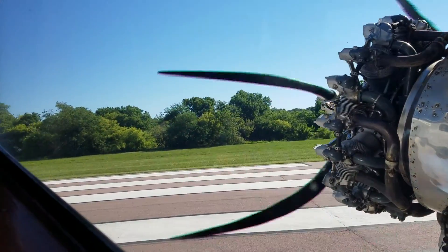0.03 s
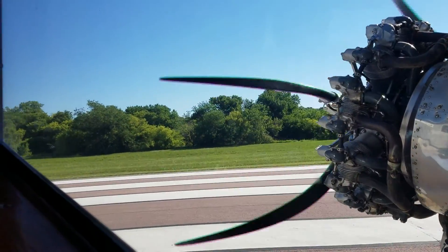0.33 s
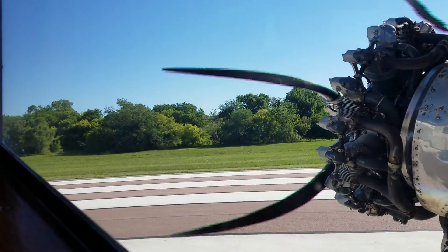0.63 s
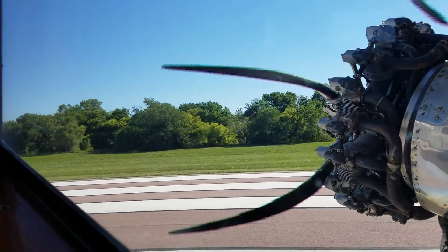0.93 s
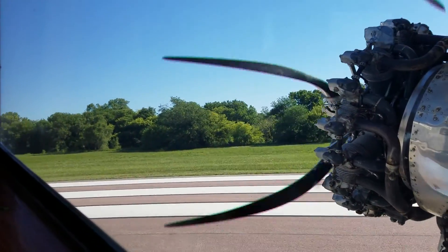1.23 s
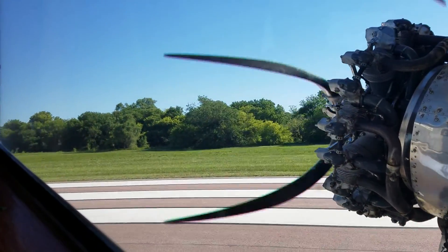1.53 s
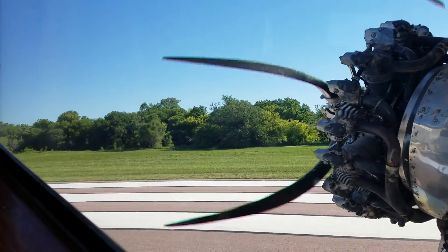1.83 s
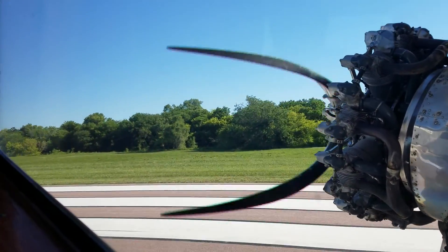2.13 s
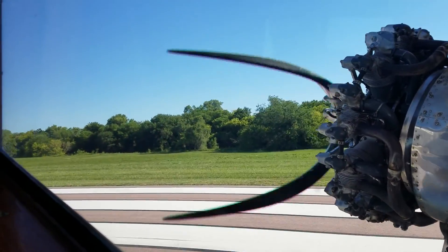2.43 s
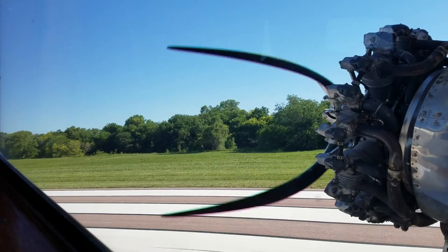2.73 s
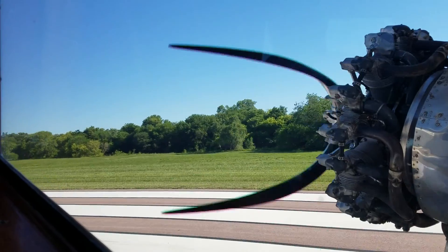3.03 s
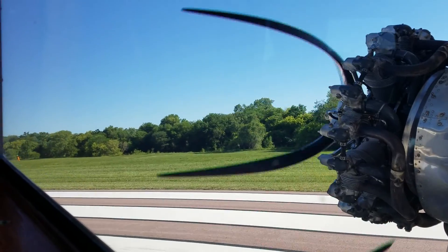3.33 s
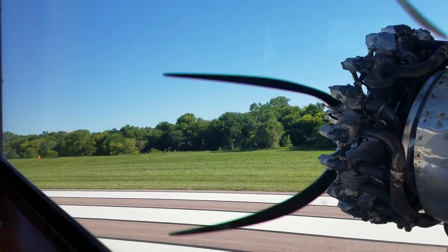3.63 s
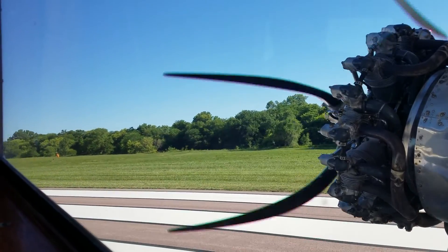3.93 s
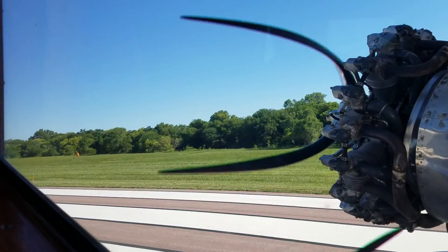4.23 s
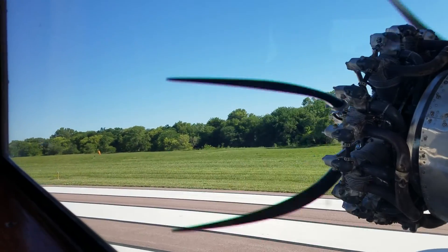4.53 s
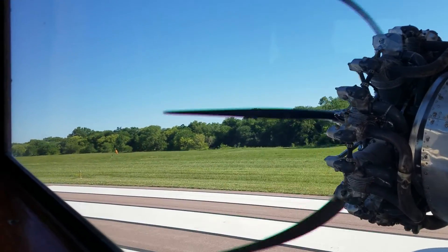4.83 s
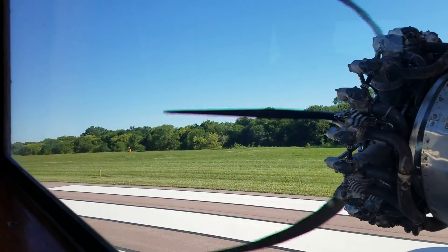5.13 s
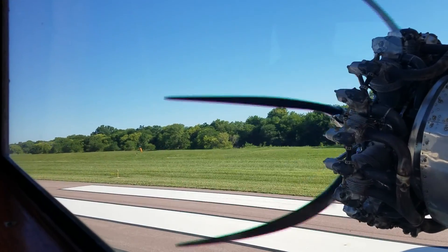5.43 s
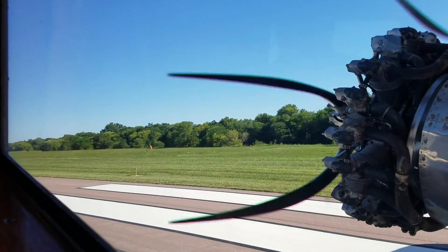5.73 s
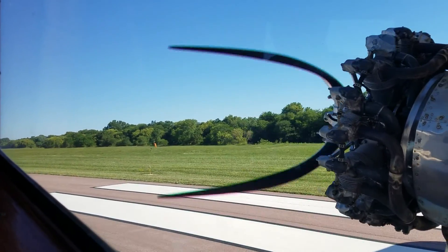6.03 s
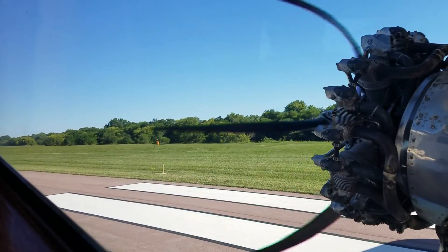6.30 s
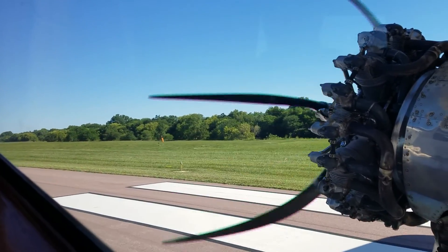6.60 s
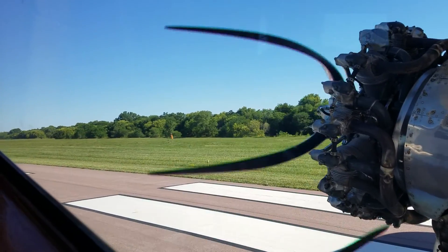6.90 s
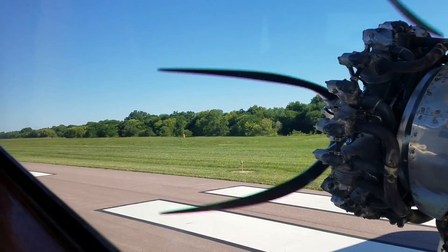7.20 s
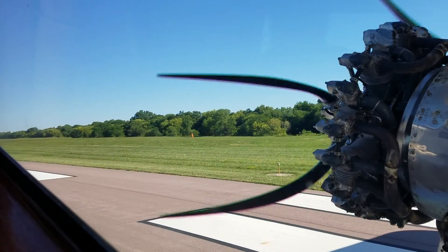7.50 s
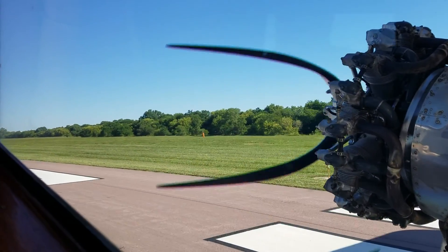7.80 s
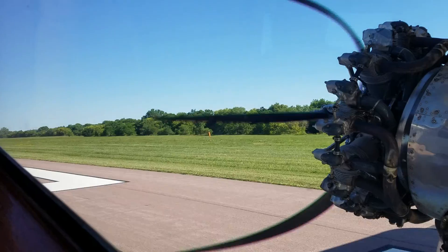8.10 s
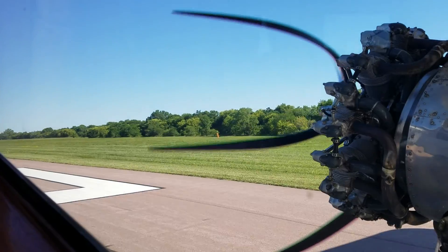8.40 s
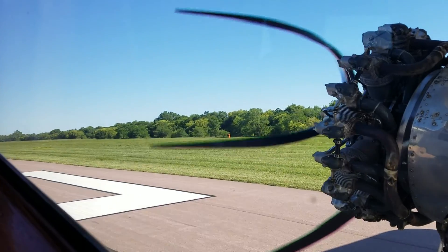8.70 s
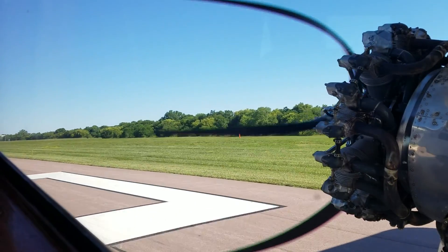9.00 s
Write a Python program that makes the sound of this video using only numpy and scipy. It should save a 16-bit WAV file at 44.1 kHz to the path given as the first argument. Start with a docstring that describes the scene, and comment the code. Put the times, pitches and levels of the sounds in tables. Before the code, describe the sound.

Inside a taxiing aircraft's cockpit, piston engines rumble and pulse low, gradually revving up while a window panel and fittings rattle faintly.

```python
"""A deep, throbbing drone fills the cockpit of a taxiing plane: three nine-cylinder radial engines
turn two-blade propellers. The throttles are eased up in turn, so the three harmonic series slide
past each other and beat by interference. Exhaust pulses rumble through the cabin, gears whine thinly,
valve gear clatters and a window panel rattles in forced vibration. Propeller wash fizzes at a gap,
and loose fittings chatter and squeak."""
import sys
import numpy as np
from scipy import signal
from scipy.fft import rfft, irfft, next_fast_len
from scipy.io import wavfile
from scipy.ndimage import uniform_filter1d, minimum_filter1d

SR = 44100
rng = np.random.default_rng(int(sys.argv[2]) if len(sys.argv) > 2 else 0)


def materialize(psi):
    """Save the field psi as 16-bit PCM at rate SR to the path in sys.argv[1].

    A 1-D psi becomes a single channel; in a 2-D psi each row is a channel.
    """
    bounded = np.clip(np.atleast_2d(psi).T, -1, 1)
    quanta = np.round(bounded * 32767).astype(np.int16)
    wavfile.write(sys.argv[1], SR, quanta)


N = 403515
TIME = np.arange(N) / SR
CYLINDERS = 9

# Levels in the tables are relative; each source applies its own gain.
# near, second and third engine: (idle speed [turns/s], pushes (time [s], gain [turns/s], lag [s]))
THROTTLES = [(23.34, [(2.984, 3.86, .63), (6.442, 1.33, .45), (7.295, 2.49, .66)]),
             (20.51, [(1.942, 4.85, .547), (5.31, 3.64, .48), (7.775, .9, .33)]),
             (20.61, [(.571, 4.7, .503), (4.193, 4.035, .418), (6.927, .81, .87)])]
# low, middle and high throttle step: (crank speed [turns/s])
THROTTLE_STEPS = [23.5, 26.5, 29.5]
# partials of each engine: (order [cycles/turn], level at the low, middle, high step [dB])
NEAR_ORDERS = [(3.1,-35,-35,-36), (4,-25.5,-20,-24), (5,-39,-33,-43), (4.5,-21,-39,-34),
               (5.5,-28.5,-27.5,-28), (6,-22.5,-19,-10.5), (7,-35,-34,-27), (8,-28,-19,-29.5),
               (8.5,-34,-30,-30.5), (9,-28.5,-31.5,-44), (10,-30,-32.5,-42), (12,-54,-31.5,-44),
               (14,-28.5,-40.5,-33.5), (18,-39,-46,-40)]
SECOND_ORDERS = [(3.5,-39,-44,-26.5), (4,-29,-22.5,-16), (4.5,-29,-35,-26.5), (5.5,-33,-27,-36),
                 (6,-28,-24.5,-18.5), (8,-33,-26,-16), (8.5,-30,-27,-42), (9,-25.5,-39.5,-48),
                 (10,-26.5,-35,-27), (12,-35.5,-41.5,-34.5), (14,-42,-42.5,-29), (16,-31.5,-47,-32.5),
                 (20,-43,-49,-41), (22,-46,-57,-40)]
THIRD_ORDERS = [(4,-44,-26,-44), (4.5,-25,-18.5,-14.5), (5,-31,-32.5,-39), (5.5,-22,-24.5,-22),
                (6,-26,-50,-49), (6.5,-22,-20.5,-28.5), (8,-43,-41,-33), (9,-36,-27.5,-27),
                (10,-38.5,-35.5,-30), (12.5,-29,-35,-45), (15.5,-34.5,-35,-49), (16.5,-37.5,-37,-55)]
# each engine in the cabin: (partials, throb level [dB], delay of the right channel [s])
ENGINES = [(NEAR_ORDERS, -2, -0.00016), (SECOND_ORDERS, 0, 0.00028), (THIRD_ORDERS, -11, 0.00014)]
# contour of the throb, for propellers falling in and out of step: (time [s], level [dB])
THROB_LEVEL = [(0.0, -24), (.55, -21), (1.3, -19), (1.45, -22), (2.62, -23.5), (2.8, -16.5), (4.15, -16.5),
               (5.7, -20), (5.97, -28), (6.15, -19), (8.6, -16.5), (8.95, -35), (9.15, -22)]
# mean engine speed at idle, part throttle and taxi power: (speed [turns/s])
MEAN_SPEEDS = [23.1, 25.04, 30.8]
# each noise at those three speeds: (level [dB])
RUMBLE_DB = [.5, -2.5, 0.9]
CLATTER_DB = [0.8, -0.23, -1.7]
PANEL_DB = [-28.5, -30, -33]
FIZZ_DB = [0.9, 1.5, -2.4]
# exhaust as the cabin transmits it: (frequency [Hz], left level [dB], right level [dB])
RUMBLE_SPECTRUM = [(12, -68, -68), (26, -51, -58), (45, -44, -48), (70, -46, -43), (113, -41, -33),
                   (170, -40, -40), (240, -40, -39), (262, -45, -43.5), (306, -45, -41.5),
                   (408, -49, -45.5), (497, -55.5, -55.5), (670, -56.5, -57.5), (1060, -75.5, -69.5),
                   (2030, -103, -96)]
# harmonics and sidebands of two gears meshing 28 and 36 times a turn:
# (order [cycles/turn], level at the low, middle, high step [dB])
GEAR_ORDERS = [(72, -50, -50, -53), (84, -55, -55, -57), (107, -53, -51, -58), (108, -49, -49, -56),
               (109, -55, -54, -56), (112, -51, -53, -62), (140, -54, -59, -67), (168, -57, -64, -70)]
# valve gear and churned air: (frequency [Hz], left level [dB], right level [dB])
CLATTER_SPECTRUM = [(60, -68, -83), (200, -78, -60), (390, -69, -51), (695, -69, -54.5), (1090, -59, -55.5),
                    (1500, -64, -58.5), (1870, -69.5, -66.5), (2290, -66, -61), (2730, -67.5, -59.5),
                    (3950, -74.5, -69.5), (5040, -82, -72.5), (7470, -85.5, -79.5), (8160, -86, -105),
                    (15000, -110, -110)]
# resonances of airframe and window panel: (frequency [Hz], bandwidth [Hz], level [dB])
AIRFRAME_MODES = [(843, 53, 0.5), (2180, 150, 4.5), (2242, 47, 1), (2464, 91, 2.5), (2713, 120, 1.5),
                  (3310, 120, -32), (5350, 250, -12), (6260, 170, -21), (7700, 250, -24)]
PANEL_MODES = [(1153, 35, 1), (1244, 30, 2), (1258, 49, 6.5), (1460, 110, -14)]
# hard knocks of the panel: (time [s], level [dB])
KNOCKS = [(.539, -18.5), (.924, -15.5), (1.008, -15), (1.096, -19), (1.115, -16.5), (1.24, -20),
          (1.264, -21), (1.542, -23), (1.821, -21), (2.143, -20), (6.522, -21), (7.416, -20)]
# slow drift of clatter and panel together: (time [s], level [dB])
RATTLE_DRIFT = [(0.0, 0), (2.4, 0.6), (4.0, -1.5), (5.3, 0.9), (7.3, 0.4), (8.3, -1), (9.15, 0.9)]
# air at the window gap: (frequency [Hz], left level [dB], right level [dB])
FIZZ_SPECTRUM = [(2000, -105, -105), (4850, -100, -75), (8040, -84.5, -85.5), (9700, -95.5, -95.5),
                 (11500, -82, -86.5), (13500, -88, -81.5), (15800, -82, -90)]
# spits of air at the gap: (time [s], level [dB], decay time [s])
SPITS = [(.53, -36.5, .015), (.997, -40, .008), (2.451, -41, .02), (3.53, -40, .02), (5.523, -36.5, .015),
         (5.666, -35, .02), (5.705, -39, .012), (5.947, -37, .012), (6.245, -38, .01), (6.894, -39, .015),
         (6.961, -38, .007)]
# timbre of a spit: (frequency [Hz], level [dB])
SPIT_SPECTRUM = [(1500, -25), (3600, 2), (5000, 9), (8000, 0.5), (10000, -8), (13000, -3), (16000, -9)]
# impacts of loose fittings: (time [s], level [dB], decay time [s])
CHATTERS = [(.753, -11.5, .006), (.77, -19, 0.017), (1.094, -17, .008), (1.116, -20, 0.029),
            (2.142, -16, 0.012), (2.441, -17, .008), (3.475, -18, 0.014), (6.511, -15, .012),
            (6.524, -15.5, 0.024), (6.688, -23, 0.017)]
# timbre of those impacts: (frequency [Hz], level [dB])
CHATTER_SPECTRUM = [(300, -15), (800, 4), (2300, -2), (5000, -16.5), (8000, -24), (15000, -48)]
# metal rubbing on metal: (time [s], frequency [Hz], level [dB], duration [s])
SQUEAKS = [(1.438, 2510, -33, 0.2), (5.51, 3980, -37, .04), (5.65, 3600, -36, 0.025),
           (5.692, 3620, -37, 0.028), (5.94, 3880, -38, .035)]


def amp(db):
    """Amplitude ratio: tenfold for every 20 dB."""
    return 10 ** (np.asarray(db) / 20)


def unit_rms(x):
    """Normalisation to a mean power of one."""
    return x / np.sqrt(np.mean(x ** 2) + 1e-20)


def crank_angle(idle, pushes):
    """Angle in turns: the integral of a speed with a critically damped response to each push."""
    speed = np.full(N, float(idle))
    for start, gained, lag in pushes:
        age = np.maximum(TIME - start, 0) / lag
        speed += gained * (1 - (1 + age) * np.exp(-age))
    return np.cumsum(speed) / SR + 2 * rng.random()


def speed_of(crank):
    """Speed in turns per second, the derivative of angle."""
    return np.gradient(crank) * SR


def speed_gain(cranks, step_db):
    """Amplitude of a noise as a function of mean engine speed."""
    return amp(np.interp(speed_of(np.mean(cranks, axis=0)), MEAN_SPEEDS, step_db))


def wander(rate_hz):
    """Random modulation of unit RMS, interpolated between rate_hz draws a second."""
    draws = rng.standard_normal(12000)
    return unit_rms(np.interp(TIME * rate_hz, np.arange(len(draws)), draws))


def puffs(cycles, decay):
    """Periodic exponential decay, its time constant given as a fraction of the cycle."""
    return unit_rms(np.exp(-(cycles % 1) / decay))


def bursts(rows, rise_s=0.00037):
    """Stereo noise transients with a quick rise and an exponential decay."""
    envelope = np.zeros(N)
    for time, db, decay in rows:
        start = int(time * SR)
        t = TIME[:min(SR // 4, N - start)]
        envelope[start:start + len(t)] += amp(db) * (1 - np.exp(-t / rise_s)) * np.exp(-t / decay)
    return envelope * rng.standard_normal((2, N))


def colour(x, spectrum):
    """Spectral shaping: unit white noise takes on the power density of each level column."""
    hz, *columns = np.transpose(spectrum)
    size = next_fast_len(N + 4096)
    log_hz = np.log(np.fft.rfftfreq(size, 1 / SR) + 1)
    gain = amp([np.interp(log_hz, np.log(hz), db) for db in columns])
    return irfft(rfft(x, size) * gain, size)[:, :N] * np.sqrt(SR / 2)


def steadied(x, seconds):
    """Division by the running RMS removes slow changes of level and keeps quick beats."""
    size = int(seconds * SR / 2) * 2 + 1
    power = uniform_filter1d(uniform_filter1d((x ** 2).mean(0), size), size)
    return x / np.sqrt(power + 1e-12)


def ring(force, modes):
    """Modal response: the force convolved with a sum of damped sinusoids."""
    t = TIME[:SR // 12]
    response = sum(amp(db) * np.exp(-np.pi * width * t) * np.sin(2 * np.pi * hz * t)
                   for hz, width, db in modes)
    return signal.oaconvolve(force, response[None] / np.linalg.norm(response), axes=1)[:, :N]


def drone(cranks, waver=0.052, tilt_db_per_octave=1.2, centre_hz=110, level_db=-10, db_per_speed=0.72):
    """Periodic forces radiate harmonics: whole orders from the blades, half orders from the firing."""
    out = np.zeros((2, N))
    for (orders, _, lag), crank in zip(ENGINES, cranks):
        speed = speed_of(crank)
        for order, *step_db in orders:
            phase = 2 * np.pi * (round(2 * order) / 2 * crank + rng.random())
            size = amp(np.interp(speed, THROTTLE_STEPS, step_db)) * (1 + waver * wander(14))
            octaves = np.log2(order * speed.mean() / centre_hz)
            pan = amp(tilt_db_per_octave * octaves / 2)  # higher tones lean right
            out[0] += size / pan * np.sin(phase)
            out[1] += size * pan * np.sin(phase - 2 * np.pi * order * speed * lag)
    extra_speed = speed_of(np.mean(cranks, axis=0)) - THROTTLE_STEPS[1]
    return steadied(out, seconds=0.28) * amp(level_db + db_per_speed * extra_speed)


def throb(cranks):
    """Interference: three blade-passing tones, two cycles a turn, beat under a set level contour."""
    tones = np.zeros((2, N))
    for (_, db, lag), crank in zip(ENGINES, cranks):
        delayed = crank - lag * speed_of(crank)
        tones += amp(db) * np.sin(2 * np.pi * 2 * np.array([crank, delayed]))
    return steadied(tones, seconds=0.22) * amp(np.interp(TIME, *np.transpose(THROB_LEVEL)))


def exhaust(cranks, uneven=0.27, hiss=0.61, gain_db=-0.5, boom_cut_db=-7, boom_hz=240):
    """Source and filter: cylinders fire every second turn; the cabin shapes the pops and gas rush."""
    pops, rush = np.zeros(N), np.zeros(N)
    for crank in cranks:
        firing = crank * CYLINDERS / 2
        onsets = np.flatnonzero(np.diff(np.floor(firing)))
        strength = rng.standard_normal(CYLINDERS)  # each cylinder has its own
        strength = unit_rms(strength - strength.mean())
        scatter = uneven * rng.standard_normal(N)[:len(onsets)]
        pops[onsets] += strength[np.arange(len(onsets)) % CYLINDERS] + scatter
        rush += puffs(firing, decay=0.82) * rng.standard_normal(N)
    source = unit_rms(unit_rms(pops) + hiss * unit_rms(rush))
    rumble = colour(source, RUMBLE_SPECTRUM) * speed_gain(cranks, RUMBLE_DB) * amp(gain_db)
    # the lumpy boom of idling smooths out as the near throttle opens
    boom = signal.sosfiltfilt(signal.butter(3, boom_hz, fs=SR, output="sos"), rumble)
    throttle = np.interp(speed_of(cranks[0]), THROTTLE_STEPS, [0, 0.5, 1])
    return rumble + boom * (amp(boom_cut_db * throttle) - 1)


def gear_whine(crank, waver=0.32):
    """Tooth meshing: pitch is proportional to crank speed, and the whine fades at high speed."""
    out, speed = np.zeros((2, N)), speed_of(crank)
    for order, *step_db in GEAR_ORDERS:
        phase = 2 * np.pi * (order * crank + rng.random() + 0.33 * rng.random((2, 1)))
        size = amp(np.interp(speed, THROTTLE_STEPS, step_db)) * (1 + waver * wander(12))
        out += size * np.sin(phase)
    return out * amp([[-3], [2]])


def valve_clatter(cranks, pulsing=0.13, flicker_db=1.03, grit_db=1.5, gain_db=-1.12, airframe_db=-38):
    """Amplitude modulation: the near blades chop valve and air noise, which rings the airframe."""
    chop = 1 + pulsing * puffs(2 * cranks[0], decay=0.8)
    flicker = amp(flicker_db * wander(40) + grit_db * wander(630))
    force = unit_rms(chop * flicker) * rng.standard_normal((2, N))
    ringing = ring(force, AIRFRAME_MODES) * amp(airframe_db) * amp([[-5], [2]])
    return (colour(force, CLATTER_SPECTRUM) * amp(gain_db) + ringing) * speed_gain(cranks, CLATTER_DB)


def window_panel(cranks, uneven_db=1.5, knock_db=21.0, bounce=0.81):
    """Forced vibration: blade pressure waves shake a loose panel on the right; at times it knocks."""
    shake = unit_rms(puffs(2 * cranks[0], decay=0.63) * amp(uneven_db * wander(55)))
    rattle = shake * rng.standard_normal((2, N)) * speed_gain(cranks, PANEL_DB)
    knocks = np.zeros(N)
    for time, db in KNOCKS:
        rebound = time + rng.uniform(0.005, 0.009)
        knocks[int(time * SR)] += amp(db + knock_db)
        knocks[int(rebound * SR)] += bounce * amp(db + knock_db)
    return ring(rattle + knocks, PANEL_MODES) * amp([[-7], [2.5]])


def gap_fizz(cranks, pulsing=0.34, flicker_db=1.1, grit_db=1.0, crackle_db=2.5, ticks_per_s=18):
    """Flow noise: propeller wash crackles and spits at a window gap, pulsing harder with speed."""
    throttle = np.interp(speed_of(cranks[0]), THROTTLE_STEPS, [0, 0.5, 1])
    blades = puffs(cranks[2], decay=0.23) + puffs(2 * cranks[0], decay=0.24)
    firing = puffs(cranks[0] * CYLINDERS / 2, decay=0.4)
    pulses = 1 + pulsing * (throttle * blades + 0.55 * firing)
    grains = amp(crackle_db * np.minimum(rng.exponential(1, (2, N)), 6))
    flicker = amp(flicker_db * wander(50) + grit_db * wander(900))
    # a few larger ticks are common to both channels
    ticks = (rng.random(N) < ticks_per_s / SR) * amp(14 + 1.3 * np.minimum(rng.exponential(1, N), 3))
    crackle = unit_rms(pulses * grains * flicker) * rng.standard_normal((2, N))
    fizz = colour(crackle + ticks, FIZZ_SPECTRUM) * speed_gain(cranks, FIZZ_DB)
    return fizz + colour(bursts(SPITS), SPIT_SPECTRUM) * amp(-38)


def loose_fittings(chatter_db=-37, jitter=0.0142):
    """Impact and friction: loose metal parts chatter in noise bursts and squeak in unsteady tones."""
    out = colour(bursts(CHATTERS), CHATTER_SPECTRUM) * amp(chatter_db)
    for start, hz, db, duration in SQUEAKS:
        envelope = np.sin(np.pi * np.clip((TIME - start) / duration, 0, 1))
        pitch = hz * (1 + jitter * wander(300))
        out += amp(db) * envelope * np.sin(2 * np.pi * np.cumsum(pitch) / SR)
    return out * amp([[-5], [1]])


def scene(opening_db=-2, opening_s=0.98):
    """Superposition: three crankshafts time the sustained layers; the sum rises a little at first."""
    cranks = [crank_angle(idle, pushes) for idle, pushes in THROTTLES]
    engines = drone(cranks) + throb(cranks) + exhaust(cranks) + gear_whine(cranks[2])
    drift = amp(np.interp(TIME, *np.transpose(RATTLE_DRIFT)))
    rattles = (valve_clatter(cranks) + window_panel(cranks)) * drift
    opening = amp(np.interp(TIME, [0, opening_s], [opening_db, 0]))
    return (engines + rattles + loose_fittings() + gap_fizz(cranks)) * opening


def record(dry, ceiling=0.99, cutoff_hz=15800):
    """Peak limiting by a quick dip in gain, followed by low-pass filtering."""
    gain = ceiling / np.maximum(abs(dry).max(0), ceiling)
    gain = uniform_filter1d(minimum_filter1d(gain, size=441), size=441)
    lowpass = signal.firwin(511, cutoff_hz, window=("kaiser", 9), fs=SR)
    return signal.oaconvolve(dry * gain, lowpass[None], "same")


dry = scene()
out = record(dry)
materialize(out)
```